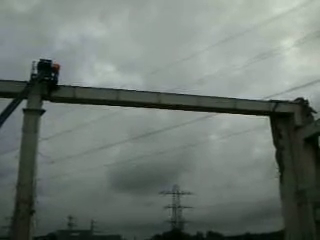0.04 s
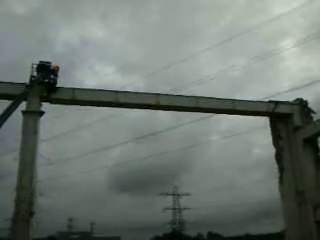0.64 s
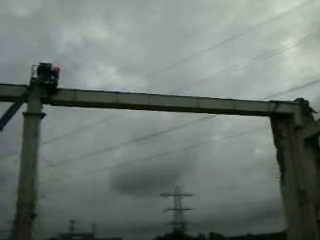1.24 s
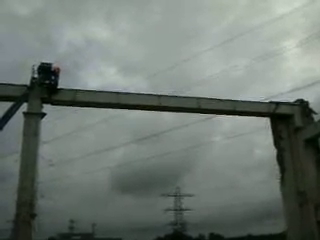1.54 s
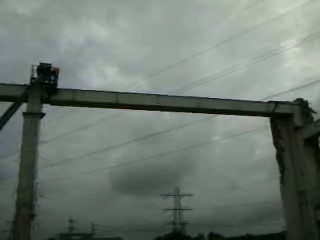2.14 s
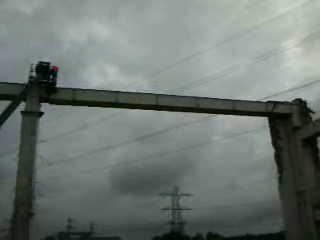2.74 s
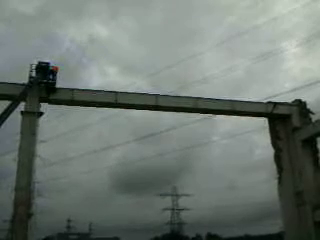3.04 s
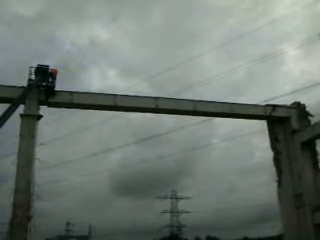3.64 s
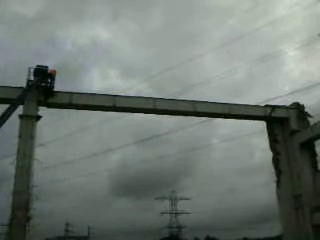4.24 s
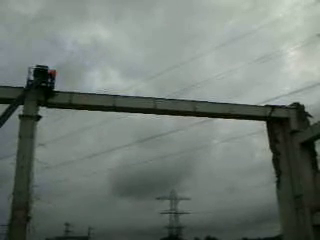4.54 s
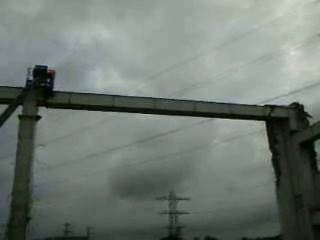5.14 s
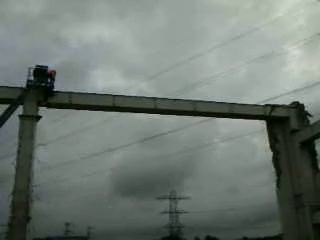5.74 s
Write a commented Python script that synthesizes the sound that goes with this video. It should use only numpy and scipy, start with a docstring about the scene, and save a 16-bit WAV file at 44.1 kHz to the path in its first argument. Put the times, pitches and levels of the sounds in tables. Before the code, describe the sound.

A heavy diesel engine runs at a steady speed for the whole six seconds or so, some way off on an open demolition site. A low exhaust throb and rumble mix with the roar of a cooling fan, a hum of spinning parts and a fine, hissy clatter, all swelling and easing slightly. Struck steel gives four light, briefly ringing clinks between 1.4 and 2.5 seconds, the first the strongest, then more at about 4.0, 4.3 and 4.7 seconds. Short dull thuds come at about 0.6, 1.6, 1.9, 2.3, 2.5, 3.3 and 4.8 seconds. Brief moaning tones rise out of the roar near 1.4 seconds, faintly at 1.9, and again around 4.0 to 4.2. The small microphone dips the level slightly for an instant after the strongest thuds. The engine carries on unchanged to the end.

```python
"""A heavy diesel engine throbs and rumbles at a steady speed, some way off on an open demolition site.
Each firing puffs gas out of the exhaust, spinning parts hum, the cooling fan roars and the engine
block clatters. Now and then struck steel clinks, the machine thuds or a brief moan rises from the roar.
A small microphone hears it all; its limiter turns the sound down just after the strongest thuds."""
import sys
import numpy as np
from scipy import signal
from scipy.fft import rfft, irfft, next_fast_len
from scipy.io import wavfile

SR = 44100
rng = np.random.default_rng(int(sys.argv[2]) if len(sys.argv) > 2 else 0)


def inscribe(sig):
    """Save sig as 16-bit PCM at rate SR to the path in sys.argv[1].

    A 1-D sig is mono; a 2-D sig holds one channel per row.
    Samples are clipped to [-1, 1] before scaling.
    """
    pcm = np.round(np.clip(np.atleast_2d(sig).T, -1, 1) * 32767)
    wavfile.write(sys.argv[1], SR, pcm.astype(np.int16))


N = 254456
TIME = np.arange(N) / SR

FIRING_HZ, FAN_TURNS_HZ = 41.1, 15.3
RUMBLE_DB, ROAR_DB, CLATTER_DB = -15.5, -15.5, -24.5  # levels before any swell
CLATTER_RISE_DB_PER_S = 0.26  # the clatter slowly comes forward

# blows on a piece of steel: (time [s], level [dB])
CLINKS = [(1.440, -19.5), (1.783, -27), (2.193, -25), (2.458, -24), (3.913, -39.5), (3.974, -22.5),
          (4.265, -29), (4.686, -26)]
# the notes that steel rings with: (pitch [Hz], level [dB], time to fade by 60 dB [s])
STEEL_NOTES = [(2006, 0, .3), (2075, -4, .12), (1960, -5, .15), (3106, -9, .12), (3198, -15, .25)]
# brief moans in the roar: (middle time [s], pitch [Hz], length [s], level [dB])
MOANS = [(1.394, 797, 0.11, -18), (1.909, 1420, .07, -27.5), (4.044, 896, .25, -17.5),
         (4.172, 555.6, 0.18, -18.5)]
# dull thuds from the working machine: (time [s], level [dB])
THUDS = [(0.568, 0), (1.566, -0.5), (1.926, 3), (2.314, -2), (2.547, 0), (3.251, 1.5), (4.828, 0.5)]
# hum of shafts, pumps and panels: (pitch [Hz], level [dB])
DRONE_TONES = [(60.1, -34.5), (78.6, -29), (87.9, -29), (97, -38.5), (105.3, -30.5), (149.7, -33),
               (156.9, -31), (175, -30.5), (262.3, -30.5), (276.7, -27.5), (314.1, -35.5), (418.7, -42.5),
               (449.5, -37.5), (553.6, -38), (767.4, -34)]
# how the drone, roar and clatter swell together: (time [s], level change [dB])
MACHINE_SWELL = [(0.05, 0), (.3, 2), (.6, 0.1), (1.25, -1.1), (1.4, 0.2), (1.62, -2.8), (1.84, 2.4),
                 (2.05, 0), (2.68, 1.5), (2.97, 1.5), (3.5, -0.74), (4.1, 1.5), (4.4, .2), (4.66, 0.3),
                 (4.9, -0.5), (5.45, -0.26), (5.77, 1.1)]
# tone colour of the engine's clatter: (frequency [Hz], relative level [dB])
CLATTER_COLOUR = [(800, -11.5), (1400, -7), (1580, -4.5), (1750, -1), (2020, 1.5), (2300, -1), (2800, -2),
                  (3090, 0), (3350, -5.5), (3650, -11), (4000, -21), (4400, -36.5), (4700, -54),
                  (5200, -110)]
# tone colour of the fan's roar: (frequency [Hz], relative level [dB])
ROAR_COLOUR = [(250, -28), (400, -11), (530, -3.5), (630, -4.5), (780, 0.5), (900, -1.5), (1070, -3.5),
               (1200, -10.5), (1320, -13), (1500, -25), (2200, -46), (4000, -86), (5500, -150)]
# tone colour of the exhaust gas: (frequency [Hz], relative level [dB])
RUMBLE_COLOUR = [(8, -25), (25, -15), (45, -4), (70, -5), (100, -.5), (120, -2.5), (170, 1), (265, 0.5),
                 (330, -5), (400, -10.5), (600, -29), (1200, -77), (3000, -150)]
# how the rumble of that gas swells: (time [s], level change [dB])
RUMBLE_SWELL = [(0, 6), (.25, -0.4), (1.3, -2.2), (2.3, -0.1), (3.0, 2), (3.45, -3.5), (3.85, 1.4),
                (4.8, -1), (5.3, 0.4), (5.77, 0.5)]
# strength of the exhaust's low firing note: (time [s], level [dB])
THROB_LEVEL = [(0, -20.5), (.3, -19.5), (1.2, -19.5), (1.55, -25), (2.2, -22), (3.1, -22), (4.8, -26.3),
               (5.08, -21.5), (5.77, -21.5)]


def amp(db):
    """Turns decibels into a number to multiply a sound by."""
    return 10 ** (np.asarray(db) / 20)


def unit(x):
    """Scales a signal so that its average strength (rms) is 1."""
    return x / np.sqrt(np.mean(x ** 2) + 1e-20)


def follow(rows):
    """Joins (time, value) points with straight lines, giving one value a sample."""
    return np.interp(TIME, *np.transpose(rows))


def colour(x, points):
    """Shapes the lows and highs of x by (frequency, level) points; the result has strength 1."""
    size = next_fast_len(N)
    hz, db = np.transpose(points)
    bin_hz = np.fft.rfftfreq(size, 1 / SR)
    gain = amp(np.interp(np.log(bin_hz + 1), np.log(hz), db))
    return unit(irfft(rfft(x, size) * gain, size)[:N])


def wander(per_s):
    """A smooth random curve of strength 1 that swings up to per_s times a second."""
    t = np.linspace(0, N / SR, num=1200)
    rate, start = rng.random((2, 24, 1))
    waves = np.sin(2 * np.pi * (per_s * rate * t + start))
    return unit(np.interp(TIME, t, waves.sum(0)))


def add(mix, start_s, sound):
    """Adds a sound to the mix at the given time."""
    part = mix[max(round(start_s * SR), 0):][:len(sound)]
    part += sound[:len(part)]


def site_echoes(x, echo_db, fade_s, echoes_per_s=2000):
    """Sound bounces off concrete and steel frames, adding many scattered echoes."""
    t = TIME[:SR // 2]
    echoes = rng.standard_normal(len(t)) * (rng.random(len(t)) < echoes_per_s / SR)
    echoes *= amp(-60 * t / fade_s)
    return x + amp(echo_db) * signal.fftconvolve(x, echoes / np.linalg.norm(echoes))[:N]


def clinks(rise_s=0.0041):
    """Each blow makes the same piece of steel ring with a few fading notes."""
    t, out = TIME[:SR // 2], np.zeros(N)
    ring = sum(amp(db - 60 * t / fade_s) * np.sin(2 * np.pi * hz * t) for hz, db, fade_s in STEEL_NOTES)
    onset = 1 - np.exp(-(t / rise_s) ** 2)
    for start_s, db in CLINKS:
        add(out, start_s, amp(db) * ring * onset)
    return site_echoes(out, echo_db=-18, fade_s=0.26)


def moans(wobble=0.27):
    """Single ringing tones rise and die away, their pitch unsteady."""
    out = np.zeros(N)
    for middle_s, hz, length_s, db in MOANS:
        t = TIME[:int(length_s * SR)]
        tone = np.sin(2 * np.pi * hz * t + wobble * wander(36)[:len(t)])
        add(out, middle_s - length_s / 2, amp(db) * np.hanning(len(t)) * tone)
    return out


def thuds(thud_hz=150, length_s=0.009):
    """The machine gives short, low pushes of air that do not ring."""
    t, out = TIME[:int(length_s * SR)], np.zeros(N)
    push = np.hanning(len(t)) * np.sin(2 * np.pi * thud_hz * t)
    for start_s, db in THUDS:
        add(out, start_s, amp(db) * push)
    return out


def drone(drift_hz=0.3, waver_db=1.5):
    """Spinning parts hum; each tone wavers and fades on its way through the air."""
    out = np.zeros(N)
    for hz, db in DRONE_TONES:
        cycles = np.cumsum(hz + drift_hz * wander(1.565)) / SR + rng.random()
        tone = np.sin(2 * np.pi * cycles) * amp(waver_db * wander(2))
        out += amp(db) * unit(tone)
    return out


def firing_pulse(firings, depth):
    """A loudness curve that jumps each time the engine fires and sinks until the next time."""
    return 1 + depth * np.exp(-(firings % 1) / 0.36)


def clatter(firings, ticks_per_s=6000):
    """Fuel injectors, valves and gears tick too fast to be told apart, over a hiss."""
    ticks = unit(rng.standard_normal(N) * (rng.random(N) < ticks_per_s / SR))
    ticks *= firing_pulse(firings, depth=0.16)
    hiss = 1.4 * rng.standard_normal(N)
    level_db = CLATTER_DB + CLATTER_RISE_DB_PER_S * (TIME - TIME.mean())
    return amp(level_db) * colour(ticks + hiss, CLATTER_COLOUR)


def fan(pulse_depth=0.064, flutter_db=0.32):
    """Air forced through the radiator roars, pulsing slightly with each turn of the fan."""
    pulse = 1 + pulse_depth * np.sin(2 * np.pi * FAN_TURNS_HZ * TIME)
    level_db = ROAR_DB + flutter_db * wander(77)
    return amp(level_db) * pulse * colour(rng.standard_normal(N), ROAR_COLOUR)


def exhaust(firings, flutter_db=0.5):
    """The firings blend into a low, throbbing note, and each one pushes out a puff of swirling gas."""
    throb_db = follow(THROB_LEVEL) + flutter_db * wander(7)
    throb = unit(np.sin(2 * np.pi * firings))
    rumble_db = RUMBLE_DB + follow(RUMBLE_SWELL)
    puffs = rng.standard_normal(N) * firing_pulse(firings, depth=0.21)
    return amp(throb_db) * throb + amp(rumble_db) * colour(puffs, RUMBLE_COLOUR)


def scene():
    """Mixes all the sources; the engine's speed control holds it steady to about one percent."""
    firings = np.cumsum(FIRING_HZ + 0.45 * wander(0.7)) / SR  # running count of firings
    pipe = exhaust(firings)
    machine = amp(follow(MACHINE_SWELL)) * (drone() + fan() + clatter(firings))
    return (pipe + machine + moans() + clinks() + thuds())[None]


def limiter(x, ceiling_db=-2.5, recovery_db_per_s=48, attack_s=0.000012):
    """Turns the volume down almost at once on any peak over the ceiling, then lets it creep back."""
    over_db = 20 * np.log10(np.maximum(abs(x) / amp(ceiling_db), 1))
    recovery_db = recovery_db_per_s * TIME
    cut_db = np.maximum.accumulate(over_db + recovery_db) - recovery_db
    lag = np.exp(-1 / (attack_s * SR))
    smooth_cut_db = signal.lfilter([1 - lag], [1, -lag], cut_db)
    return x * amp(-smooth_cut_db)


def low_pass(x, edge_hz):
    """Sharply cuts away the treble above edge_hz."""
    weights = signal.firwin(511, edge_hz, window=("kaiser", 9), fs=SR)
    return signal.oaconvolve(x, weights, "same")


def record(dry):
    """The small microphone holds down loud peaks, then loses the highest treble."""
    return low_pass(limiter(dry[0]), edge_hz=15850)[None]


dry = scene()
out = record(dry)
inscribe(out)
```